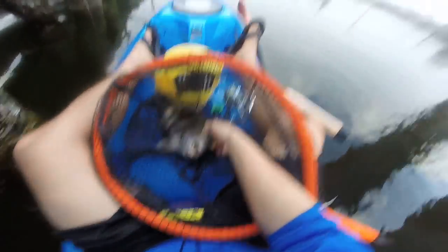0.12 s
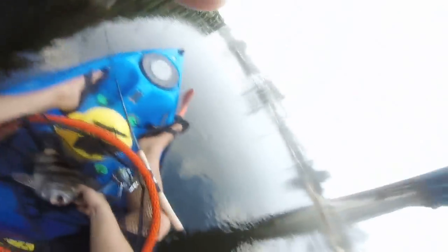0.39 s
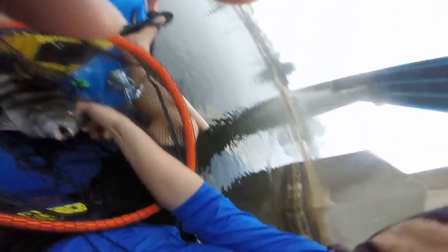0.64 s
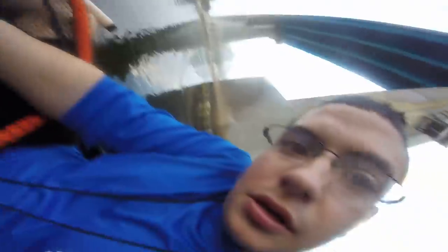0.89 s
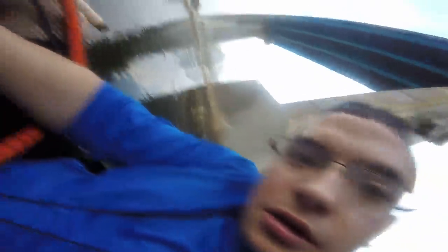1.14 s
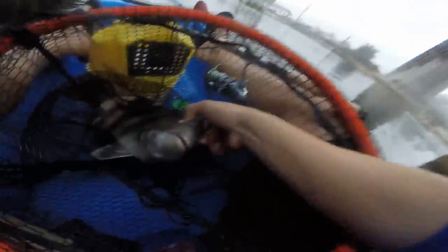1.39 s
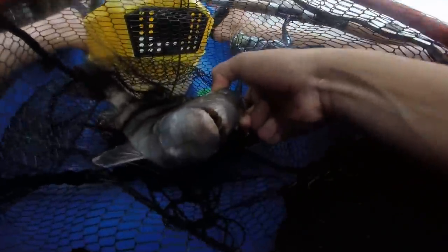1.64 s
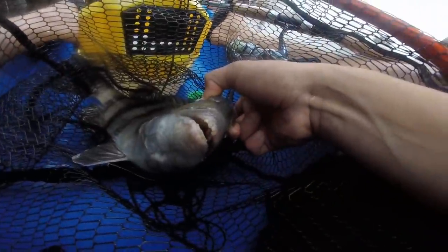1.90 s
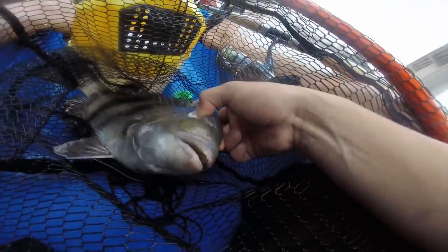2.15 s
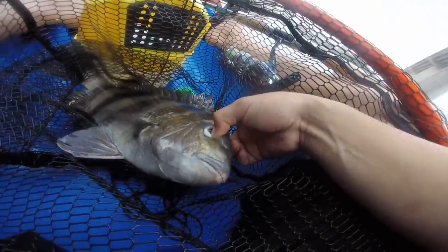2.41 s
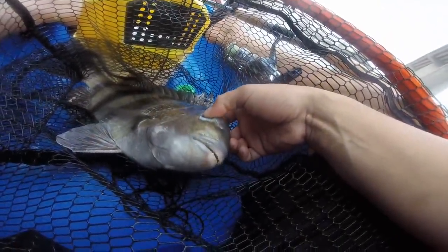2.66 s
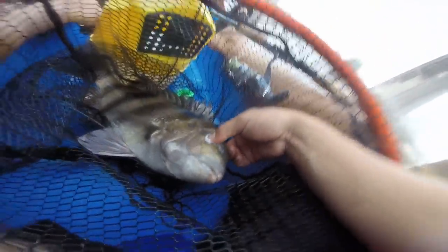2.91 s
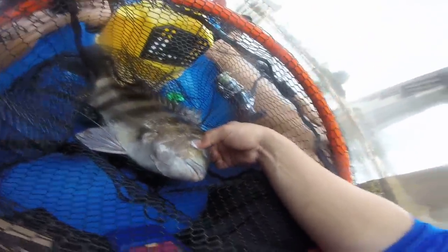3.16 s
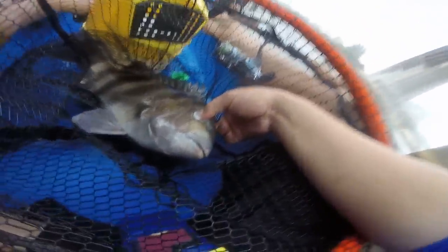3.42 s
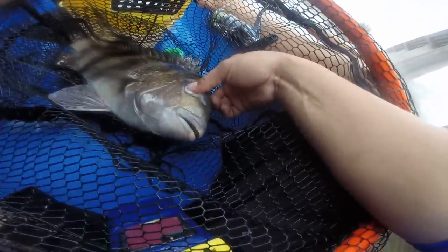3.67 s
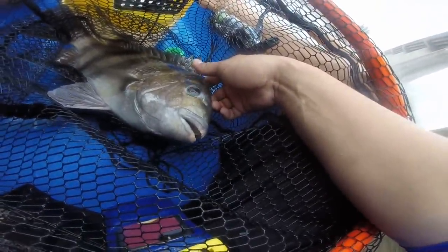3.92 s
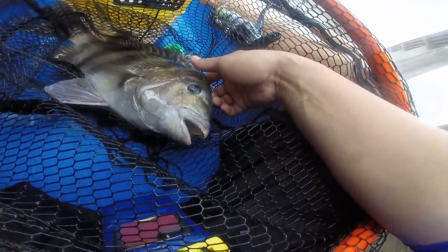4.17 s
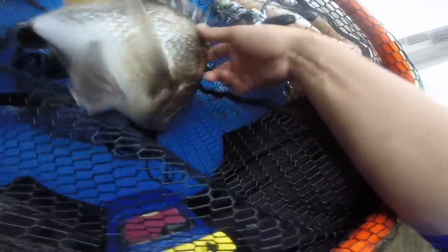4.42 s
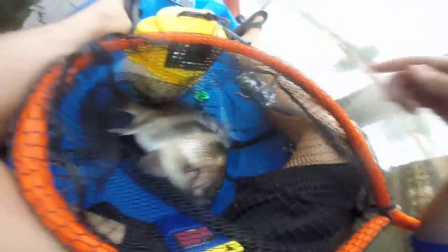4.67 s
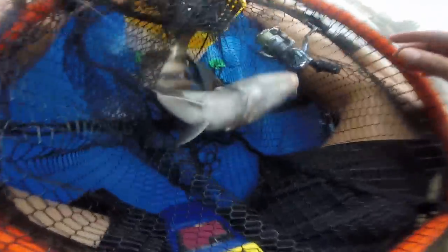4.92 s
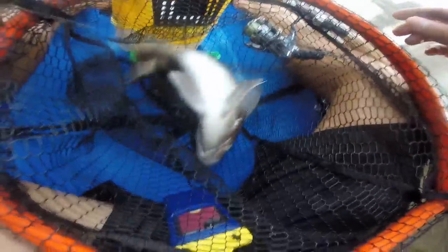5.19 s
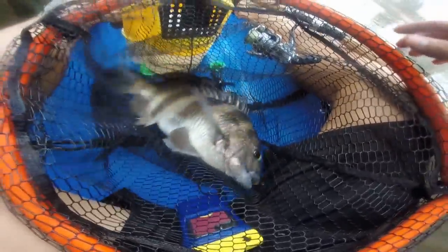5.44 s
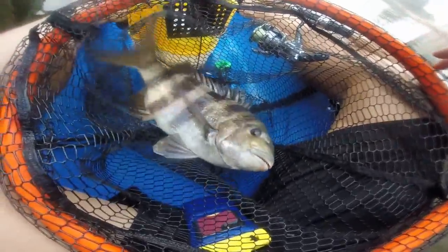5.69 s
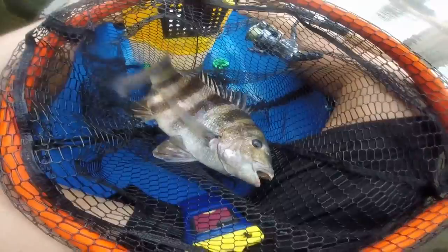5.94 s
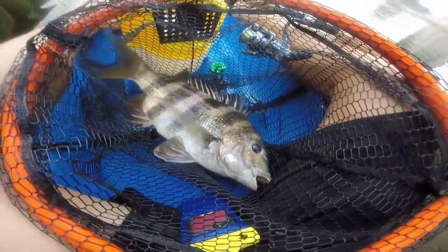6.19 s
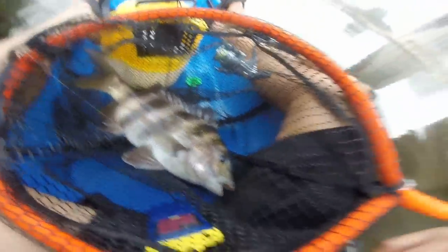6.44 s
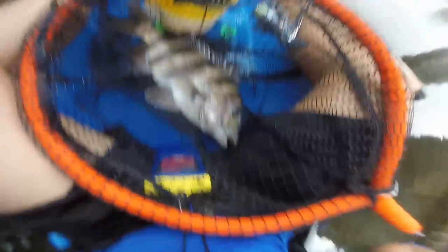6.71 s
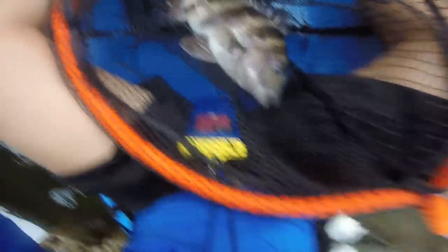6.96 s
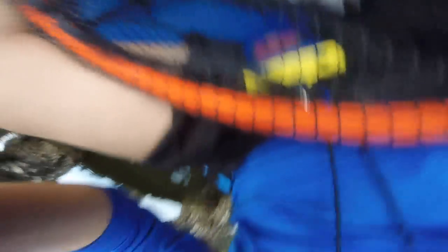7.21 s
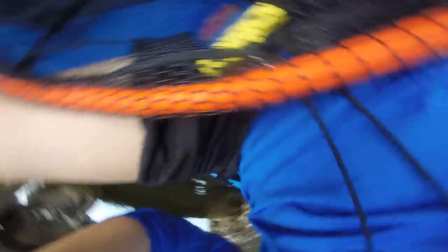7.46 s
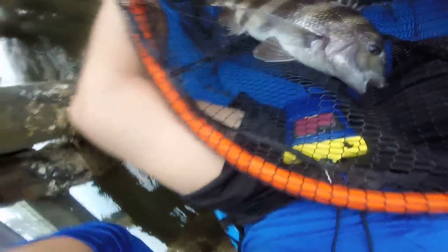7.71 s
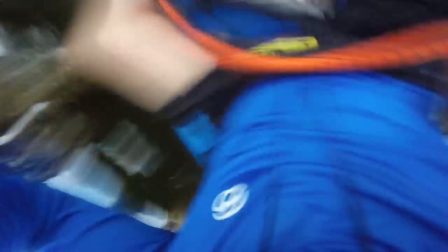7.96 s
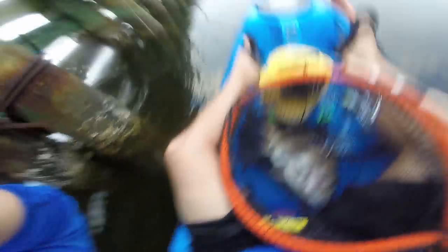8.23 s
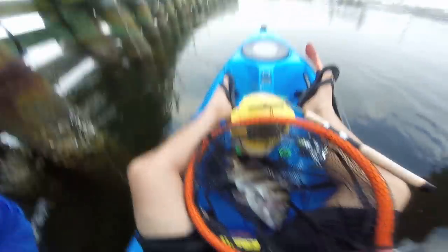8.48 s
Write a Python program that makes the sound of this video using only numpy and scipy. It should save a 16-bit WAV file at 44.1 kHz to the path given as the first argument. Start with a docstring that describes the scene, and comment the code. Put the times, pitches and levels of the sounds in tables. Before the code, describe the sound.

Fingers rub and knock the plastic case around a microphone, then a fish slaps wetly in a net before heavier fumbling and one hard thump.

```python
"""On a boat, a small camera in a sealed plastic case is held by hand over a fish that flops in a landing net.
Fingers and strap rub, scuff and knock the case: runs of noisy slips ring its modes, as do the fish's wet slaps.
Jolts thump through the mount as short dying swings, and shaking noise rings its own modes.
Underneath lie a slow noise rumble that follows the handling, and the steady hiss of the microphone."""
import sys
import numpy as np
from scipy import signal
from scipy.fft import rfft, irfft
from scipy.io import wavfile
from scipy.ndimage import uniform_filter1d

SR = 44100
rng = np.random.default_rng(int(sys.argv[2]) if len(sys.argv) > 2 else 0)


def unload_audio(sound):
    """Save the sound as a 16-bit wav file, at the path given as the first command line argument."""
    columns = np.transpose(np.atleast_2d(sound))
    # keep every value between -1 and 1, then stretch to whole-number steps
    steps = np.round(np.clip(columns, -1, 1) * 32767)
    wavfile.write(sys.argv[1], SR, steps.astype(np.int16))


def invert_db(x):
    """Field ratio 10**(x/20) for x, a level in decibels (scalar or array-like)."""
    u = np.asarray(x, float) / 20
    return 10 ** u


N = 379260

# handling of the case, as curves: [t/s, rubbing level/dB, treble against rubbing/dB, slow rumble level/dB]
HANDLING = [(0.0, -58, -19, -36.5), (0.15, -33.5, -17.5, -21), (0.42, -27, -35, -26),
            (0.54, -52.5, -11, -31.5), (0.92, -47.5, -29, -37), (1.1, -57.5, -17, -43.5),
            (1.62, -47.5, -34, -35), (2.11, -57, -47, -48), (2.77, -62.5, -39, -46),
            (3.02, -44.5, -49, -39), (3.31, -59, -22, -48), (4.37, -65, -35, -47.5), (4.45, -52, -17, -38),
            (4.94, -45, -31, -42), (5.08, -44, -27, -32.5), (5.45, -48.5, -28, -43.5),
            (5.9, -50.5, -42, -46), (6.5, -53.5, -27, -50.5), (6.97, -36, -27.5, -37),
            (7.38, -26.5, -33, -27), (7.66, -36.5, -48, -33), (7.84, -45, -35, -40.5),
            (8.11, -43, -29, -46), (8.2, -51, -16, -36.5), (8.46, -37, -28, -48), (8.5, -53, -34, -58),
            (8.59, -38.5, -24, -29)]
# long smooth swipes of cloth across the case: [start t/s, length t/s, top level/dB, treble against it/dB]
SWIPES = [(0.127, 0.35, -19, -19), (8.113, 0.52, -38.5, -15.5)]
# ticks and scuffs on the case: [top t/s, low modes level/dB, middle against low/dB, rise t/ms, fall t/ms]
SCUFFS = [(0.079, -39, 5, 0.18, 1.8), (0.1404, -14, -6, 0.17, 1.18), (0.466, -28, -11.5, 2, 0.2),
          (0.588, -40.5, 1.5, 9.2, 7.5), (0.651, -45, -3.5, 0.3, 0.62), (0.676, -37.5, -4, 0.34, 3.9),
          (0.705, -29.5, -6, 13.7, 3.5), (0.743, -24.5, -6.5, 2.9, 6.3), (0.769, -37, -14, 0.28, 1.3),
          (0.927, -42.5, -4.5, 18, 36), (1.269, -39.5, -5, 1.6, 1.3), (1.389, -56, 7, 0.27, 0.92),
          (1.417, -26, -2.5, 6.7, 3.4), (1.547, -64, 11, 0.25, 0.66), (1.554, -39, -8, 15, 6),
          (1.594, -39.5, 1.5, 0.81, 2.4), (1.602, -29, -3.5, 0.32, 1.7), (1.625, -31.5, -7, 8, 8.9),
          (1.64, -41.5, 3.5, 4.6, 1.8), (1.674, -27, -15.5, 1.8, 2.7), (1.712, -42.5, -8, 7.6, 16),
          (1.839, -45.5, -10.5, 48, 21), (2.988, -42.5, -3, 0.27, 1.3), (3.03, -40.5, -11, 0.25, 1.8),
          (3.05, -51.5, 3, 0.44, 2.3), (3.075, -49, -4, 1.5, 7.3), (3.125, -55, -9, 21, 16),
          (3.548, -41, -15, 0.49, 3.9), (6.959, -27, -20, 0.66, 5.4), (6.985, -22.5, -1.5, 15.4, 5.6),
          (7.089, -40, -1, .5, 1.9), (7.108, -36, -3.5, 6, 2), (7.144, -24.5, -1.5, 0.39, 9.1),
          (7.162, -18.5, -10.5, 2.4, 1.4), (7.231, -25, -6.5, 39, 1.5), (7.253, -41, 3, .4, 0.92),
          (7.278, -35.5, 0.5, 0.25, 1.5), (7.359, -19.5, -2, 0.55, 3.4), (7.404, -26.5, -3, 38, 15),
          (7.418, -24.5, -4, 3.4, 3.8), (7.461, -31, -8, .4, 3), (7.482, -29.5, -5, 12, 2.4),
          (7.597, -33.5, -2, 0.96, 1.3), (7.648, -22, -3.5, 4.9, 4.8), (7.661, -27, -7.5, 1.7, 13.3),
          (7.713, -36.5, -4, 0.59, 3.4), (7.786, -36, -8.5, 52, 5.8), (7.964, -37, -5.5, 0.3, 0.77),
          (7.992, -44, -3, 0.84, 1.5), (8.035, -32, -2, 7.5, 8), (8.071, -32.5, -0.5, 1.6, 5)]
# wet slaps of the fish in the net: [top t/s, low modes level/dB, middle against low/dB, rise t/ms, fall t/ms]
SLAPS = [(4.419, -31.5, 4.5, 4.1, 12), (4.475, -51, -0.5, 13, 23), (4.595, -40, -5, 5.9, 5.8),
         (4.62, -45, -10, 0.5, 4.4), (4.653, -37, -12, 0.79, 2.4), (4.667, -34, -12, 0.28, 5.1),
         (4.705, -56, -2, 10, 7.5), (4.766, -38, 0, 0.28, 7.3), (4.778, -34.5, 4.5, 0.79, 11.4),
         (4.835, -39, -11, 18, 5.5), (4.903, -32, 0, 12, 15.4), (4.96, -34.5, -8, 22, 11),
         (5.005, -40.5, -7, 12, 10), (5.127, -42, 3.5, 15, 16), (5.203, -31.5, -3, 0.23, 9.4),
         (5.219, -41, 7, 5.5, 4.1), (5.258, -42, 7.5, 5.1, 13), (5.324, -40, -4.5, 14, 24),
         (5.368, -43, -2, 9.2, 5.8), (5.62, -60.5, 6.5, 52, 41)]
# jolts through the mount that start with a push: [t/s, peak level/dB, settled pitch f/Hz]
PUSHES = [(0.723, -17.5, 140), (0.773, -15.5, 189), (1.412, -34, 218), (1.535, -24.5, 198),
          (1.6737, -11, 154.6), (3.037, -33.5, 140), (3.187, -23.5, 177), (3.548, -19.5, 180),
          (3.617, -35.5, 197), (3.712, -36, 204), (4.667, -14.5, 190), (4.887, -23.5, 210),
          (5.203, -14.5, 171), (5.403, -28, 192), (6.602, -26.5, 103), (6.983, -13.5, 192),
          (7.074, -19, 202), (7.161, -17.5, 217), (7.211, -19, 196), (8.068, 0.9, 213), (8.339, -12.5, 146)]
# jolts that start with a pull: [t/s, peak level/dB, settled pitch f/Hz]
PULLS = [(0.416, -23, 107), (0.57, -19.5, 52.4), (1.635, -21, 140), (4.436, -19, 155), (4.932, -19.5, 130),
         (7.3596, -8.5, 123), (7.6551, -13, 130), (8.033, -16, 117), (8.104, -19.5, 70.4),
         (8.547, -20.5, 121)]
# shudders, in which the mount rattles for a moment: [start t/s, length t/s, top level/dB]
SHUDDERS = [(0.791, 0.056, -34.5), (1.79, 0.1, -42), (4.584, 0.047, -35.5), (4.793, 0.068, -33.5),
            (4.938, 0.029, -31.5), (4.974, 0.064, -35), (5.19, 0.11, -38), (5.27, 0.12, -41),
            (7.071, 0.12, -28.5), (8.065, 0.035, -35), (8.324, 0.02, -29), (8.408, 0.049, -33),
            (8.545, 0.033, -35.5)]
# modes the case rings with: [centre f/Hz, nominal width f/Hz, relative level/dB]
CASE = [(820, 380, -6), (1120, 163, 7), (1345, 565, 1.5), (1957, 440, -4), (2462, 630, 0.5),
        (3100, 750, -5.5), (3540, 650, -9), (4190, 660, -17), (5370, 660, -22), (6060, 2000, -20.5),
        (7690, 930, -26), (8970, 1800, -28.5), (10670, 480, -33), (11600, 1000, -38.5),
        (13700, 8600, -43.5)]
# modes the mount shakes at: [centre f/Hz, nominal width f/Hz, relative level/dB]
MOUNT = [(140, 51, -0.5), (222, 90, 4), (245, 570, -17), (540, 160, -18.5)]
# spectrum of the slow rumble: [f/Hz, relative level per Hz/dB]
RUMBLE = [(8, 7.5), (25, 4.5), (60, -2), (110, -11.5), (300, -51), (20000, -100)]
# spectrum of the microphone hiss: [f/Hz, relative level per Hz/dB]
HISS = [(35, -31), (60, -0.5), (212, -5.5), (715, -13), (3420, -24), (14200, -41), (16000, -62)]


def rubbing():
    """Dense tiny slips and sharper catches ring the case; light rubs are patchy, hard rubs and swipes smooth."""
    rub, treble, _ = played(HANDLING)
    swipe, swipe_treble = swiping()
    level = rub + swipe
    treble = (treble * rub + swipe_treble) / level
    light = rub / level / (1 + rub / invert_db(-24))  # near 1 for a light rub, low for hard rubs and swipes

    slips = invert_db(1.76 * np.minimum(rng.exponential(1, N), 5))
    slips *= rng.random(N) < 12000 / SR  # 12000 slips a second on average
    catch_odds = 110 / SR * np.minimum(rub / invert_db(-48), 1)  # rarer when the hand rests
    catches = 2.4 * rng.random(N) * (rng.random(N) < catch_odds) * light
    slips = slips + signal.lfilter([1], [1, -0.97], catches)
    slips *= lumps(ms=14, depth_db=3.97 * light)

    parts = case_parts()
    rings = []
    for part in parts:
        grains = slips * rng.standard_normal(N) * lumps(ms=33, depth_db=2.8 * light)
        rings.append(signal.oaconvolve(evened(grains) * level, part)[:N])
    low, middle, high = rings

    # each catch also snaps in the treble
    snaps = invert_db(1) * catches * light * rub * np.sign(rng.standard_normal(N))
    high = treble * high + signal.oaconvolve(snaps, parts[-1])[:N]
    return invert_db(-4.5) * low + invert_db(-3) * treble ** 0.2 * middle + high


def swiping():
    """Level of the cloth swipes and of their treble: each swells and ebbs."""
    lean, peakedness = 0.78, 4.1  # how early the top comes, how narrow it is
    level, treble = np.zeros(N), np.zeros(N)
    for s, length, db, treble_db in SWIPES:
        progress = np.arange(0, 1, 1 / (length * SR))
        arch = np.sin(np.pi * progress ** lean) ** peakedness
        add(level, s, invert_db(db) * arch)
        add(treble, s, invert_db(db + treble_db) * arch)
    return level, treble


def scuffs(table, body_share, favour_db):
    """Each touch is a run of slips that swells to one sharp top and dies, ringing the case and the mount."""
    out = np.zeros(N)
    ms = np.arange(-60, 70, 1000 / SR)
    top = slice(*np.searchsorted(ms, (-2, 4)))  # the stretch at which levels are set
    favoured = favour_db * (np.arange(len(CASE)) == 5)  # lifts one case mode
    for s, db, middle_db, rise, fall in table:
        shape = np.exp(-abs(ms) / np.where(ms < 0, max(rise, 0.1), max(fall, 0.1)))
        slips = rng.standard_normal(len(ms)) * (2.4 + abs(rng.standard_normal(len(ms))))
        run = slips * shape * lumps(ms=2.05, depth_db=3.16, count=len(ms))  # ragged
        # each touch lands on its own spot; a brighter one favours higher modes
        spot_db = 2.8 * rng.standard_normal(len(CASE)) + favoured
        responses = case_parts(1.9 * (middle_db + 2.5), spot_db)
        responses.append(ringing(MOUNT[2:]))  # the touch also stirs the upper modes of the mount
        rings = [signal.oaconvolve(run, response) for response in responses]
        low, middle, treble, body = (ring / np.std(ring[top]) for ring in rings)
        low = low + body_share * body
        treble_db = -14 + 1.75 * middle_db
        touch = low + invert_db(middle_db) * middle + invert_db(treble_db) * treble
        add(out, s + ms[0] / 1000, invert_db(db) * touch)
    return out


def jolts(table):
    """A one-sided push swings back and dies within a few cycles, dropping a little in pitch."""
    out, t = np.zeros(N), np.arange(SR // 4) / SR
    for s, peak_db, hz in table:
        turns = hz * (t + 0.0005 * (1 - np.exp(-t / 0.01)))
        fade = invert_db(-11 * hz * t) + 0.095 * invert_db(-3.5 * hz * t)  # dB a cycle
        swing = np.sin(2 * np.pi * turns) * fade
        # the whole case lurches slowly
        swing -= 0.15 * np.sin(0.8 * np.pi * hz * t) * invert_db(-4 * hz * t)
        swing *= 1 - np.exp(-(hz * t / 0.16) ** 2)  # soft start
        add(out, s, invert_db(peak_db) * swing / abs(swing).max())
    return out


def sway():
    """Slow pressure rumble, and lumpy shaking that rings the mount; both follow the handling and the jolts."""
    rub, _, rumble = played(HANDLING)
    unrest = aftermath()
    rumble = rumble + invert_db(-9) * unrest
    shake = invert_db(-15) * (rub + swiping()[0]) ** 0.77  # grows 0.77 dB for each dB of rubbing
    shake = shake + invert_db(-19.5) * unrest + shuddering()
    tugs = evened(rng.standard_normal(N) * lumps(ms=22, depth_db=2.5))
    shaking = signal.oaconvolve(tugs * shake, ringing(MOUNT))[:N]
    return rumble * coloured(RUMBLE) + shaking


def aftermath():
    """Unrest that each jolt leaves behind, building over a few ms and dying away."""
    settle_s = 0.076  # time to fall 60 dB
    kicks = np.zeros(N)
    for s, peak_db, _ in PUSHES + PULLS:
        kicks[round(s * SR)] = invert_db(peak_db)
    dying = signal.lfilter([1], [1, -invert_db(-60 / (settle_s * SR))], kicks)
    build = np.hanning(SR // 150)
    return signal.oaconvolve(dying, build / build.sum())[:N]


def shuddering():
    """Strength of the mount's rattling: each shudder swells and ebbs."""
    out = np.zeros(N)
    for s, length, db in SHUDDERS:
        progress = np.arange(0, 1, 1 / (length * SR))
        add(out, s, invert_db(db) * np.sin(np.pi * progress))
    return out


def microphone_hiss():
    """Coloured noise whose level wavers a little."""
    return invert_db(-55.5) * coloured(HISS) * lumps(ms=51, depth_db=1.95)


def case_parts(tilt_db=0, spot_db=np.zeros(len(CASE))):
    """Low, middle and treble responses of the case, energy 1 each; tilt in dB an octave, spot in dB a mode."""
    middle_hz, treble_hz = 1800, 4700  # where the modes are split
    parts = [[], [], []]
    for (hz, width, db), more_db in zip(CASE, spot_db):
        octaves = np.log2(min(hz, 2 * middle_hz) / middle_hz)  # the tilt stops an octave up
        part = int(hz > middle_hz) + int(hz > treble_hz)
        parts[part].append((hz, width, db + more_db + tilt_db * octaves))
    return [ringing(modes) for modes in parts]


def ringing(modes, size=8192):
    """Causal minimum-phase response, energy 1, whose power spectrum is a sum of steep peaks."""
    f = abs(np.fft.fftfreq(size, 1 / SR))
    power = sum(invert_db(2 * db) / (1 + (2 * (f - hz) / width) ** 2) ** 2.24 for hz, width, db in modes)
    log_gain = np.log(power + 1e-10) / 2
    spectrum = np.exp(np.conj(signal.hilbert(log_gain)))
    taps = np.fft.ifft(spectrum).real[:size // 2]
    return taps / np.linalg.norm(taps)


def coloured(points):
    """Steady noise of a given spectrum, rms 1."""
    f, db = np.transpose(points)
    hz = np.fft.rfftfreq(N, 1 / SR)
    gain = invert_db(np.interp(np.log(hz + 1), np.log(f + 1), db))
    return evened(irfft(rfft(rng.standard_normal(N)) * gain, N))


def lumps(ms, depth_db, count=N):
    """Random level changes of about ms length and depth_db rms, as gains."""
    wander = uniform_filter1d(rng.standard_normal(count), max(int(ms * SR / 1000), 1))
    return invert_db(depth_db * evened(wander))


def played(table):
    """The columns of a curve table as gains, sample by sample."""
    s, *columns = np.transpose(table)
    return [invert_db(np.interp(np.arange(N) / SR, s, column)) for column in columns]


def evened(x):
    """Scales to rms 1."""
    return x / np.sqrt(np.mean(x ** 2) + 1e-20)


def add(mix, s, sound):
    """Mixes a sound in at s seconds."""
    part = mix[max(round(s * SR), 0):][:len(sound)]
    part += sound[:len(part)]


def scene():
    """Everything reaches one microphone inside the case."""
    touches = scuffs(SCUFFS, body_share=0.35, favour_db=0)
    slaps = scuffs(SLAPS, body_share=0.41, favour_db=6)
    thumps = jolts(PUSHES) - jolts(PULLS)
    return (rubbing() + touches + slaps + thumps + sway() + microphone_hiss())[None]


def low_pass(x):
    """Removes everything above the highest recorded frequency."""
    return signal.sosfilt(signal.butter(12, 16480, fs=SR, output="sos"), x)


def record(dry):
    """A limiter ducks the sound just after peaks over -2 dB and then lets go; the very top clips."""
    peak_db = 20 * np.log10(abs(dry[0]) + 1e-9)
    fall = np.arange(N) * 30 / SR  # the tracked peak falls 30 dB a second
    tracked_db = np.maximum.accumulate(peak_db + fall) - fall
    over_db = np.maximum(tracked_db + 2, 0)
    late_db = np.r_[np.zeros(260), uniform_filter1d(over_db, 200)][:N]  # it reacts a few ms late
    ducked = dry / invert_db(3.5 * late_db)  # 3.5 dB down for each dB over
    lowpass = signal.firwin(255, 15600, fs=SR)[None]
    finished = signal.oaconvolve(np.clip(ducked, -1, 1), lowpass, "same")
    return low_pass(finished)


dry = scene()
out = record(dry)
unload_audio(out)
```